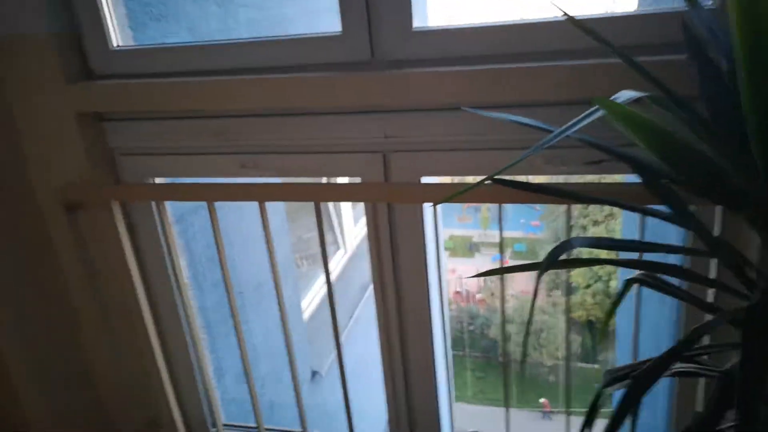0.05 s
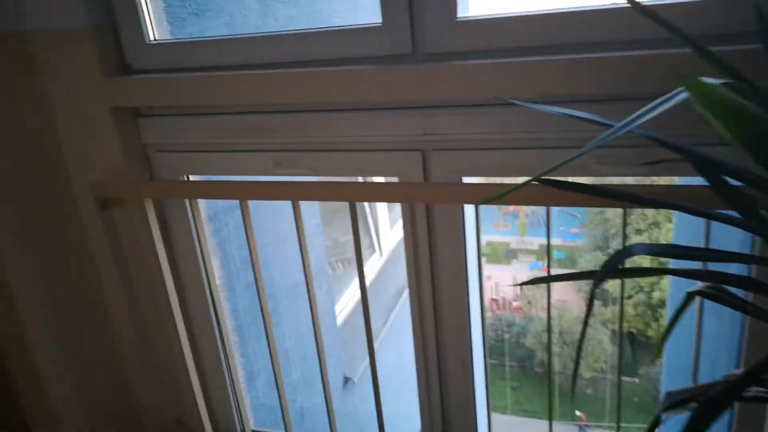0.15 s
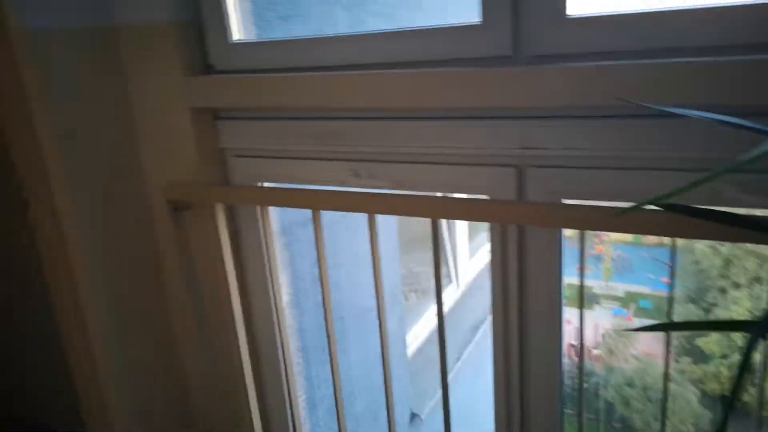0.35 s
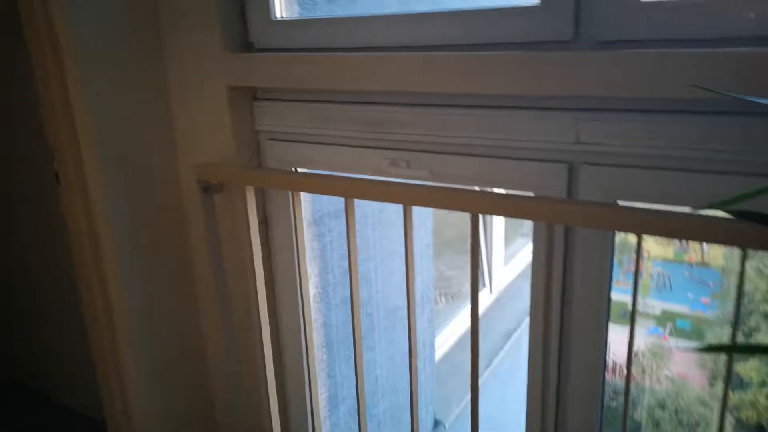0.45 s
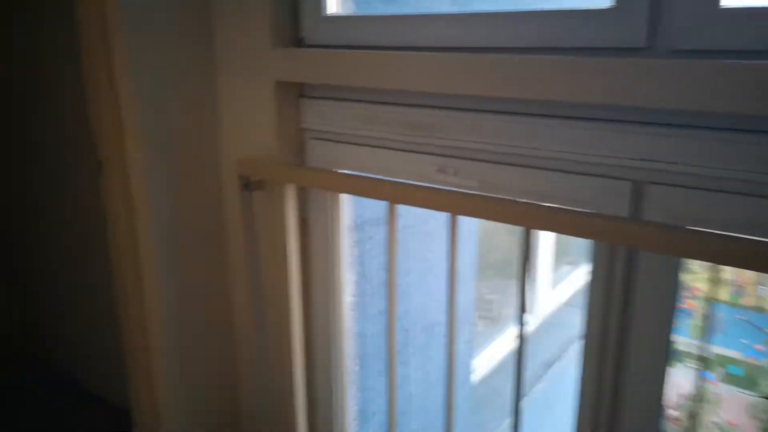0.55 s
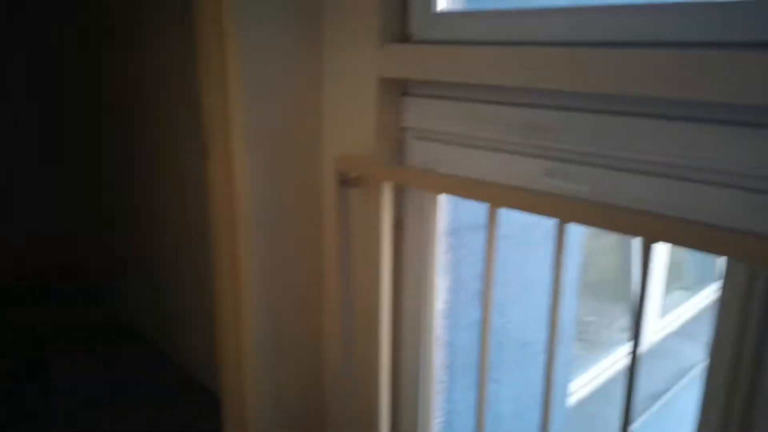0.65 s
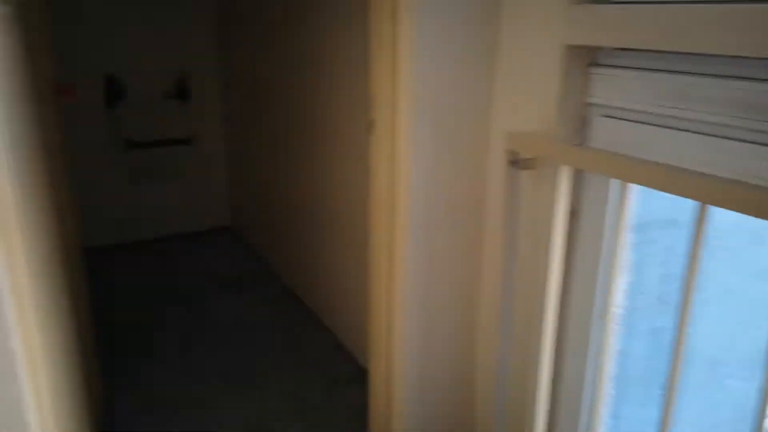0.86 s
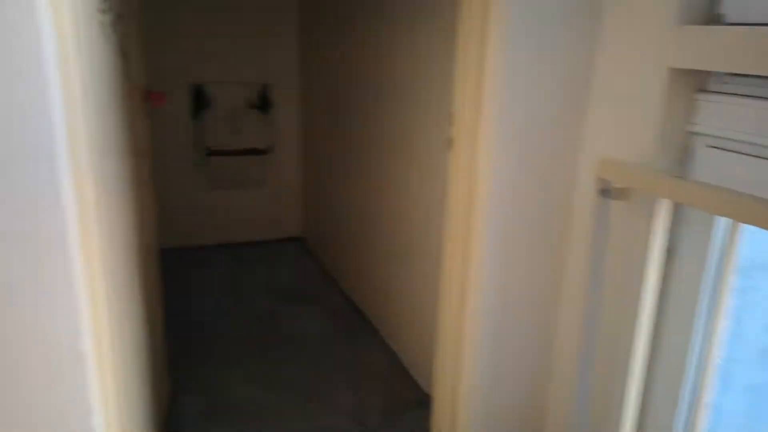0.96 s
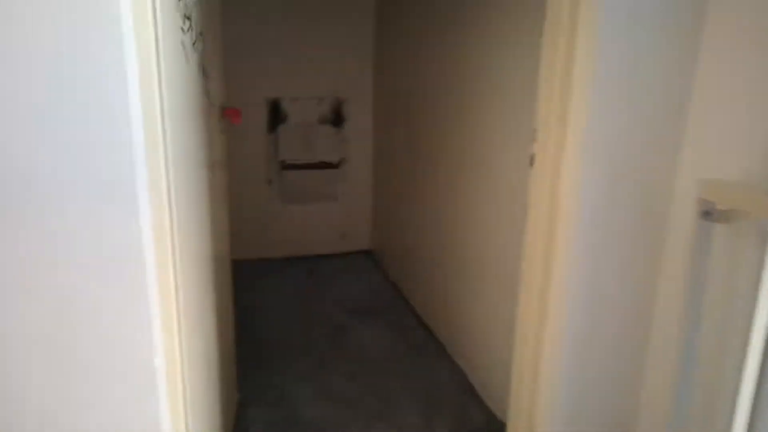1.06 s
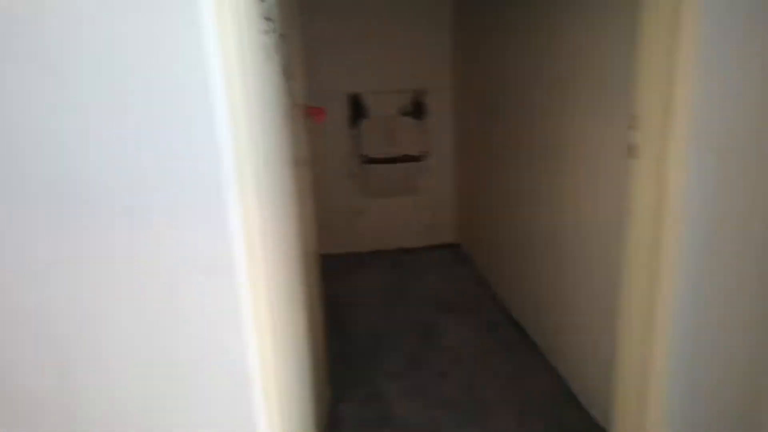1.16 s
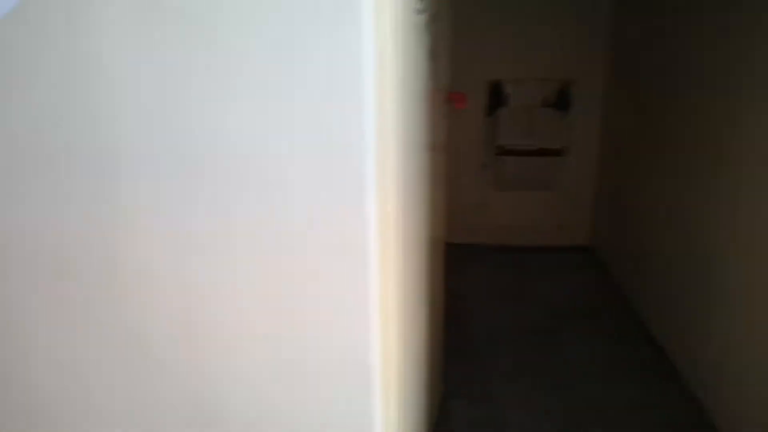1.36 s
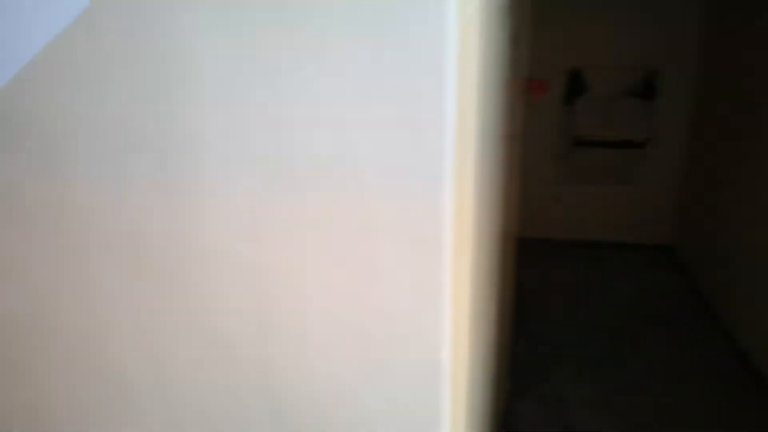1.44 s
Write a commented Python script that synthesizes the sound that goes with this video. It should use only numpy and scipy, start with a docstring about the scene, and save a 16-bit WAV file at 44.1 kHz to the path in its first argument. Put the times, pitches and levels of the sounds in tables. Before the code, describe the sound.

A door closes among hard stairwell walls: first soft knocks and a short scuff, then the nearby latch snaps and the door thumps, rattles briefly and rings out. A low rumble swells and fades beneath faint rustling.

```python
"""A door shuts in a bare stairwell

A few light knocks and a brief swish lead to the bright snap of the latch and the thump of the leaf,
which rings on in its normal modes. Each impact is a short burst of chatter, and the hard walls answer
it with dense reverberation. A deep rumble swells and fades over faint rustling and quiet room noise."""
import sys
import numpy as np
from scipy import signal
from scipy.fft import rfft, irfft
from scipy.io import wavfile
from scipy.ndimage import uniform_filter1d

SR = 44100
rng = np.random.default_rng(int(sys.argv[2]) if len(sys.argv) > 2 else 0)


def log_audio(samples):
    """Write samples as a 16-bit WAV file to the path given in sys.argv[1]."""
    # one column per channel
    frames = np.atleast_2d(samples).T
    # limit to full scale, then quantise
    limited = np.clip(frames, -1, 1)
    pcm = np.round(limited * 32767).astype(np.int16)
    wavfile.write(sys.argv[1], SR, pcm)


N = 66150
T = np.arange(N) / SR
HZ = np.fft.rfftfreq(2 * N, 1 / SR)

# correlation of the diffuse field between the two microphones: f/Hz, coefficient
COHERENCE = [(30, 1), (140, 1), (250, 0.84), (480, -.2), (1000, 0), (3000, 0.01), (16000, 0)]
# balance, left minus right: f/Hz, level/dB
BALANCE = [(100, -0.5), (200, 0.4), (380, 0), (700, -2), (1300, -4), (2400, -1.5), (4000, 1), (8000, -0.6),
           (15000, -4)]


def amp(db):
    """Amplitude ratio for a level in decibels."""
    return 10 ** (np.asarray(db) / 20)


def unit(x):
    """Normalisation to rms 1."""
    return x / np.sqrt(np.mean(x ** 2) + 1e-20)


def at_hz(points, hz=HZ):
    """Interpolation on a logarithmic frequency axis."""
    f, value = np.transpose(points)
    return np.interp(np.log(hz + 1), np.log(f + 1), value)


def curve(points):
    """Linear interpolation in time."""
    return np.interp(T, *np.transpose(points))


def peak(hz, octaves):
    """A spectral peak: a Gaussian of height 1 in log frequency."""
    return np.exp(-.5 * (np.log2((HZ + 1) / hz) / octaves) ** 2)


def add(mix, start_s, sound):
    """Superposition of a delayed stereo sound on the mix."""
    part = mix[:, max(round(start_s * SR), 0):]
    part += sound[:, :part.shape[1]]


def colour(x, spectrum_db):
    """Minimum-phase filtering by a spectrum of unit power, tilted by the stereo balance."""
    gain = unit(amp(spectrum_db)) * amp(np.outer([.5, -.5], at_hz(BALANCE)))
    cepstrum = irfft(np.log(gain + 1e-6))
    cepstrum[:, 1:N] *= 2  # folding the cepstrum makes the filter causal
    cepstrum[:, N + 1:] = 0
    return irfft(rfft(x, 2 * N) * np.exp(rfft(cepstrum)))[:, :N]


def diffuse_field():
    """White noise at two points, coherent at long wavelengths and incoherent at short ones."""
    common, independent = rfft(rng.standard_normal((2, 2 * N)))
    coherence = at_hz(COHERENCE)
    right = coherence * common + np.sqrt(1 - coherence ** 2) * independent
    return irfft(np.array([common, right]))[:, :N]


def noise(spectrum):
    """Stationary diffuse noise of a given spectrum, rms 1."""
    return unit(colour(diffuse_field(), at_hz(spectrum)))


def room():
    """The noise floor: a slowly settling diffuse field and a low hum that dies away."""
    # room noise spectrum: f/Hz, relative level/dB
    air_spectrum = [(20, 5.5), (60, -7), (100, -1), (165, 1), (260, -6), (450, -19), (900, -21),
                    (2000, -24), (3300, -25), (5500, -33.5), (10000, -36), (12500, -35), (16000, -40)]
    # hum envelope: t/s, level/dB
    hum_envelope = [(0.0, -62), (0.2, -59.5), (0.4, -58), (0.55, -67.5), (0.8, -66), (1.5, -81)]
    air_db, fall_db_per_s, hum_hz = -58, 1.5, 215.9
    hum = np.sqrt(2) * amp(curve(hum_envelope)) * np.sin(2 * np.pi * (hum_hz * T + rng.random()))
    return amp(air_db - fall_db_per_s * T) * noise(air_spectrum) + hum


def rumble():
    """A deep resonance, modulated in amplitude and frequency, with a weak skirt of noise."""
    # swell and fade: t/s, level/dB
    envelope = [(0.0, -56), (0.036, -48.5), (0.1, -42.5), (0.192, -62), (0.22, -45.5), (0.258, -37),
                (0.484, -28), (0.622, -34.5), (0.668, -47.5), (0.726, -47), (0.802, -37.5), (0.94, -46.5),
                (0.986, -53.5), (1.178, -52), (1.228, -45), (1.366, -49.5), (1.398, -73), (1.5, -53)]
    # pitch: t/s, f/Hz
    pitch = [(0.0, 32.16), (0.12, 34.68), (0.24, 36.74), (0.33, 40.14), (0.55, 40.87), (0.8, 40.4),
             (1.1, 40.3), (1.5, 39.36)]
    # noise around the tone: f/Hz, relative level/dB
    skirt = [(15, 2), (35, 7), (60, 0.5), (100, -4), (140, -13.5), (250, -27.5), (600, -51), (16000, -99)]
    tone = np.sqrt(2) * np.sin(2 * np.pi * np.cumsum(curve(pitch)) / SR)
    return amp(curve(envelope)) * (tone + amp(-16) * noise(skirt))


def rubbing():
    """Friction noise: a bright swish, a dull scuff, a light scrape before the latch, a faint rustle."""
    # envelopes: t/s, level/dB
    swish = [(0.0, -74), (0.16, -72), (0.225, -67.5), (0.275, -61), (0.33, -64.5), (0.45, -75), (0.55, -62),
             (0.7, -105)]
    scuff = [(0.16, -90), (0.195, -52.5), (0.25, -52.5), (0.32, -53), (0.42, -62), (0.55, -63),
             (0.75, -100)]
    scrape = [(0.345, -105), (0.37, -54), (0.45, -56), (0.53, -55), (0.7, -105)]
    rustle = [(0.0, -63), (0.16, -70.5), (0.95, -66), (1.04, -65.5), (1.17, -65), (1.34, -67),
              (1.42, -70.5), (1.5, -68)]
    # spectra: f/Hz, relative level/dB
    swish_spectrum = [(100, -31), (3500, -11), (4500, -8.5), (5600, -2), (8000, -4.5), (10000, -6),
                      (12000, -21), (16000, -21)]
    scuff_spectrum = [(60, 0), (200, -13), (340, 4), (500, -10), (900, -8.5), (2200, -11), (3200, -25),
                      (6000, -27.5), (16000, -66)]
    scrape_spectrum = [(100, -12.5), (700, -5), (1500, 2), (2700, 1), (3700, -5), (4400, -11.5),
                       (5500, -7.5), (6600, -22.5), (10000, -27), (16000, -29)]
    rustle_spectrum = [(100, 3), (500, -2.5), (1100, -4), (2400, -3.5), (3600, -12.5), (5500, -8),
                       (10000, -13), (12000, -29), (16000, -20.5)]
    strokes = [(swish, swish_spectrum), (scuff, scuff_spectrum),
               (scrape, scrape_spectrum), (rustle, rustle_spectrum)]
    return sum(amp(curve(envelope)) * noise(spectrum) for envelope, spectrum in strokes)


def stairwell():
    """Double-slope reverberation of coupled spaces: quick on the landing, long and faint up the shaft."""
    # reverberation times: f/Hz, T60/s
    landing_t60 = [(80, 0.68), (350, 0.36), (1000, 0.6632), (2000, 0.325), (4000, 0.74), (8000, 0.62),
                   (13000, 0.8)]
    shaft_t60 = [(100, 3), (1000, 3.52), (2500, 1.4), (5000, 2.2), (12000, .6)]
    # initial share of the shaft relative to the landing: f/Hz, level/dB
    shaft_share = [(100, -11), (250, -21), (500, -16), (1500, -17.5), (4000, -16.5), (12000, -30)]
    build_s = 0.0027
    hz, t, field = signal.stft(diffuse_field(), SR, nperseg=256)
    hz = hz[:, None]
    landing = amp(-60 * t / at_hz(landing_t60, hz))
    shaft = amp(at_hz(shaft_share, hz) - 60 * t / at_hz(shaft_t60, hz))
    tail = signal.istft(field * np.hypot(landing, shaft), SR, nperseg=256)[1][:, :N]
    return unit(tail * (1 - np.exp(-T / build_s))) / np.sqrt(N)


def impact(spectrum_db, rattle_s, left_db, right_db):
    """A chattering contact: direct sound, at the given left and right gains, plus reverberant field."""
    chatter = rng.standard_normal((2, N)) ** 3 * np.exp(-T / rattle_s)  # cubing makes the noise spiky
    chatter /= np.linalg.norm(chatter, axis=1, keepdims=True)
    low_cut = signal.butter(2, 250, "high", fs=SR, output="sos")
    direct = signal.sosfilt(low_cut, chatter) * amp([[left_db], [right_db]])
    return colour(direct + stairwell(), spectrum_db) * np.sqrt(SR / 10)  # energy referred to 0.1 s


def knocks():
    """Impulsive excitation: each light knock has its own body, edge and brief resonance."""
    # knocks: t/s, level/dB, body/dB, edge/dB, rattle decay/s, ring f/Hz, ring/dB, direct sound/dB
    strikes = [(0.0, -47.5, -8, -7.5, 0.0097, 1560, 2, -7), (0.061, -54.5, -5, -14, .003, 2090, 7.5, -3.5),
               (0.1812, -54.5, 8, -8.5, 0.011, 1790, 7.5, -2.5), (0.354, -50, -9, 4, .012, 1790, 5, -4.5),
               (0.4904, -54.5, -12, 2, 0.0028, 2400, 13, -4), (1.015, -71.5, 6, -11, 0.01, 984, 17, 1.5)]
    # spectrum common to the knocks: f/Hz, relative level/dB
    spectrum = [(40, 3.5), (150, 1.5), (330, -1), (480, -1), (800, -2.5), (1300, -5), (1800, 1.5),
                (2400, -2.5), (3200, -10.5), (4300, -17.5), (6000, -27), (10000, -32), (15000, -44.5)]
    shade_db = 9  # the direct sound is weaker on the left
    out = np.zeros((2, N))
    for start_s, db, body_db, edge_db, rattle_s, ring_hz, ring_db, direct_db in strikes:
        tone_db = at_hz(spectrum) + body_db * peak(hz=338, octaves=0.63)
        tone_db += edge_db * peak(hz=3840, octaves=0.32)
        tone_db += ring_db * peak(ring_hz, octaves=0.14)
        add(out, start_s, amp(db) * impact(tone_db, rattle_s, direct_db - shade_db, direct_db))
    return out


def latch():
    """Brief metal contacts radiate treble: the latch ticks, then snaps twice, close on the right."""
    # contacts: t/s, level/dB
    snaps = [(0.495, -77.5), (0.5212, -58), (0.5244, -59.5)]
    # latch spectrum: f/Hz, relative level/dB
    spectrum = [(100, -43), (2000, -18), (3500, -6), (4600, -9), (5300, 6), (6000, -3.5), (6700, -1.5),
                (8000, 1), (10200, -0.5), (11800, -11.5), (13500, -34), (16000, -48)]
    out = np.zeros((2, N))
    for start_s, db in snaps:
        add(out, start_s, amp(db) * impact(at_hz(spectrum), rattle_s=0.0045, left_db=-6.5, right_db=-0.5))
    return out


def door():
    """Impact and free vibration: the leaf hits its frame, rattles and rings in damped normal modes."""
    # blows on the frame: t/s, level/dB, clank of the metal fittings/dB
    thumps = [(0.5559, -42, -1.5), (0.5675, -42, 6.5), (0.6, -53, 4), (0.636, -52, -2)]
    # thump spectrum: f/Hz, relative level/dB
    spectrum = [(40, 9.5), (90, 7.5), (122, -2), (155, 7.5), (205, -6.5), (350, 1), (500, -9), (750, -6),
                (1050, -2.5), (1450, -2.5), (1900, 0.5), (2500, -3), (3200, -15), (4400, -22), (5400, -21),
                (7500, -23), (10000, -41), (15000, -46)]
    # modes of the leaf: f/Hz, level/dB, T60/s
    modes = [(76.1, -46, 0.74), (153, -44.5, 0.53), (343, -53.5, 0.6), (397, -51, 0.33), (595, -60.5, 1),
             (1006, -61.5, .5), (1228, -50, .5), (1500, -61, 0.95), (1685, -52.5, 0.81), (1712, -51, .55),
             (1948, -49, 0.43), (1950, -44.5, 0.76), (2207, -67, 0.3), (2364, -53, 0.3)]
    first_blow_s, rise_s = thumps[0][0], 0.0058
    out = np.zeros((2, N))
    for start_s, db, clank_db in thumps:
        tone_db = at_hz(spectrum) + clank_db * peak(hz=1900, octaves=0.092)
        add(out, start_s, amp(db) * impact(tone_db, rattle_s=0.003, left_db=-10.5, right_db=-6.5))
    for hz, db, t60 in modes:
        phase_spread = 1 - at_hz(COHERENCE, hz)
        phase = 2 * np.pi * (rng.random() + phase_spread * rng.random((2, 1)))
        pan = amp(np.array([[.5], [-.5]]) * at_hz(BALANCE, hz))
        ring = np.sin(2 * np.pi * hz * T + phase) * (1 - np.exp(-T / rise_s))
        add(out, first_blow_s, pan * amp(db - 60 * T / t60) * ring)
    return out


def scene():
    """Superposition of all sources at the two microphones."""
    return knocks() + latch() + door() + rumble() + rubbing() + room()


def record(dry):
    """Downward expansion: a noise suppressor turns quiet treble down; a low-pass then limits the band."""
    split_hz, edge_hz = 3200, 15750
    threshold_db, knee_db, max_cut_db = -62, 2, 5
    treble = signal.sosfiltfilt(signal.butter(3, split_hz, "high", fs=SR, output="sos"), dry)
    power = uniform_filter1d((treble ** 2).mean(0), size=1000)
    level_db = 10 * np.log10(abs(power) + 1e-14)
    cut_db = max_cut_db * (1 - np.tanh((level_db - threshold_db) / knee_db)) / 2
    suppressed = dry + treble * (amp(-cut_db) - 1)
    low_pass = signal.firwin(511, edge_hz, window=("kaiser", 9), fs=SR)
    return signal.oaconvolve(suppressed, low_pass[None], "same")


dry = scene()
out = record(dry)
log_audio(out)
```